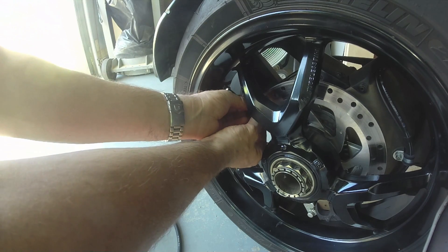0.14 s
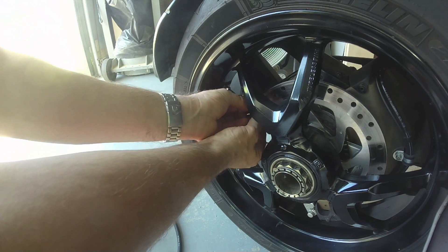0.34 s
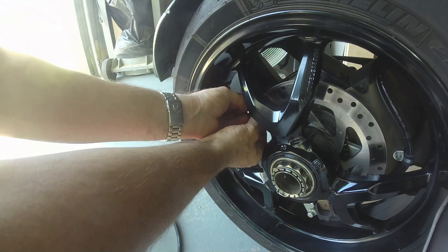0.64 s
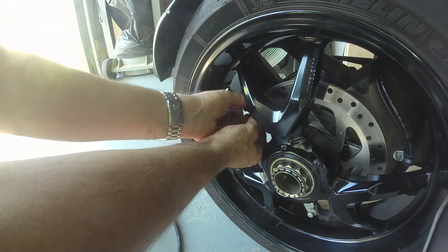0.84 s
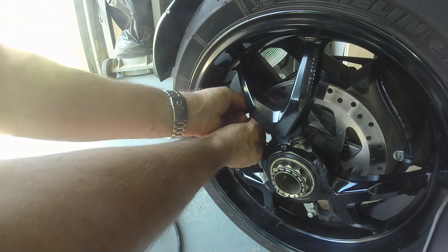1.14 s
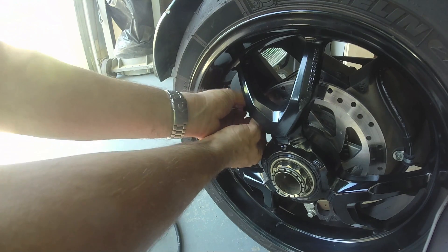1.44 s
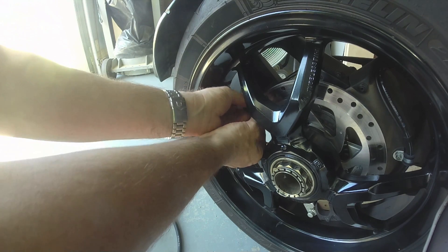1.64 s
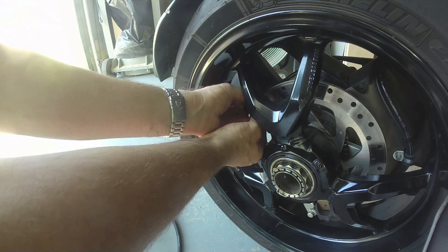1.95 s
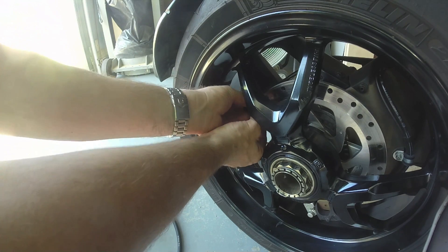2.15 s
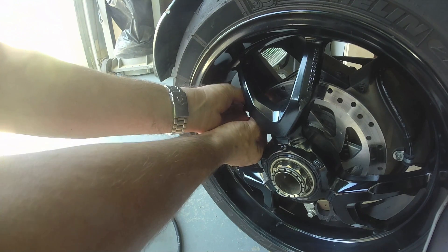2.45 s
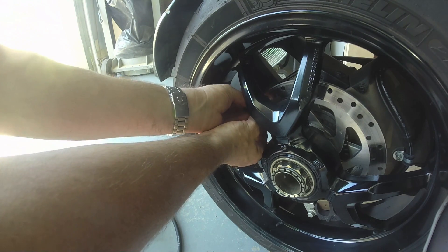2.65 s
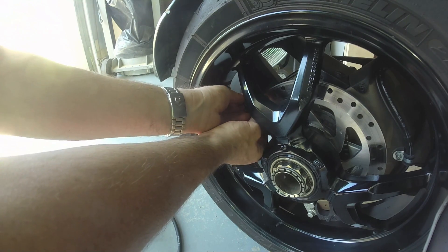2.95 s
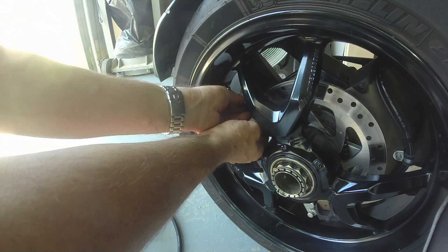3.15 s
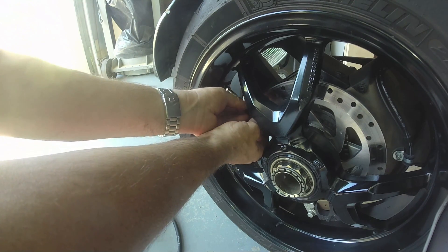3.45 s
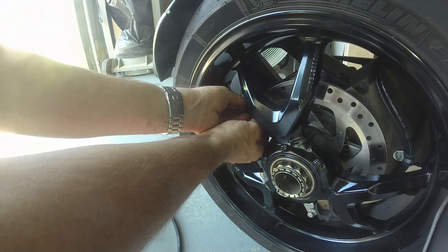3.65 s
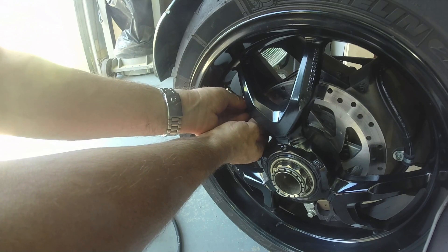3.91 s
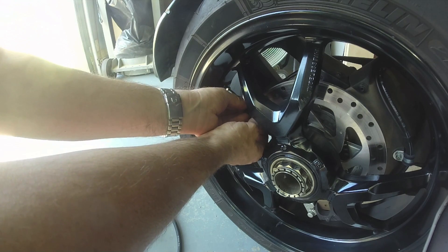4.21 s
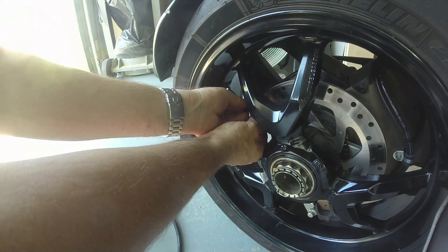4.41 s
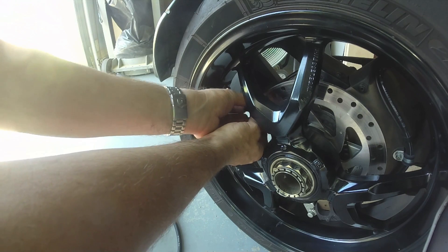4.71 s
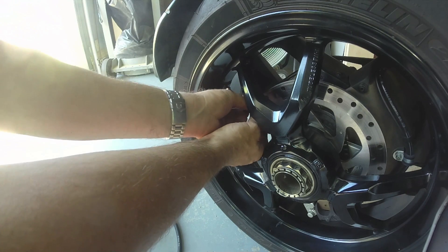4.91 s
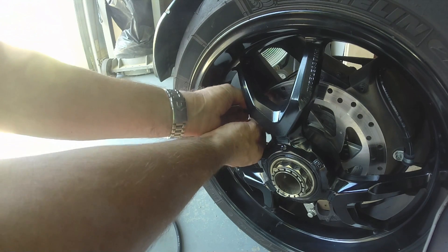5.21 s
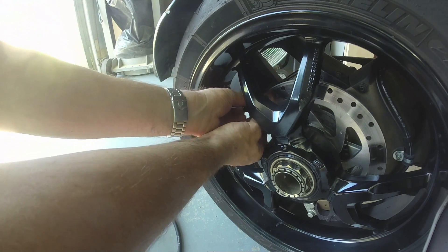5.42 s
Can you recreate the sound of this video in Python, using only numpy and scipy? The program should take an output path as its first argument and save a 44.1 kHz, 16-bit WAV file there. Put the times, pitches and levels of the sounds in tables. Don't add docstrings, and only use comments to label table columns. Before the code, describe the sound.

Quiet hissing escapes as a valve core is loosened by hand, with a few small metallic clicks and brief puffs of air. Then pressurised air rushes out suddenly, bright and turbulent, its whistle coming and going, dips, and returns in stronger bursts until the core pops free. Close mono pickup, slight room reverberation, with distant low rumble and a wavering motor hum behind.

```python
import sys
import numpy as np
from scipy import signal
from scipy.fft import rfft, irfft, next_fast_len
from scipy.io import wavfile
from scipy.ndimage import uniform_filter1d

SR = 44100
rng = np.random.default_rng(int(sys.argv[2]) if len(sys.argv) > 2 else 0)


def nominal_scale(level):
    x = np.asarray(level, float) / 20
    return 10 ** x


def materialize(psi):
    bounded = np.clip(np.atleast_2d(psi).T, -1, 1)
    quanta = np.round(bounded * 32767).astype(np.int16)
    wavfile.write(sys.argv[1], SR, quanta)


N = 245637


def in_time(rows):
    s, *columns = np.transpose(rows)
    return [np.interp(np.arange(N) / SR, s, column) for column in columns]


def rms_one(x):
    return x / np.sqrt(np.mean(x ** 2) + 1e-20)


def drift(rate_hz):
    r = np.exp(-40 * np.pi * rate_hz / SR)
    noise = rng.standard_normal(N // 20 + 2002)
    slow = signal.lfilter([1], [1, -2 * r, r * r], noise)[2000:]
    return np.interp(np.arange(N) / 20, np.arange(len(slow)), rms_one(slow))


def resonance(x, hz, width_hz):
    r = np.exp(-np.pi * width_hz / SR)
    zeros = np.array([1, 0, -1]) * (1 - r * r) / 2
    poles = [1, -2 * r * np.cos(2 * np.pi * hz / SR), r * r]
    return signal.lfilter(zeros, poles, x)


def spell(start_s, length_s, fade_s):
    t = np.arange(N) / SR - start_s
    return np.clip(np.minimum(t, length_s - t) / fade_s + 0.5, 0, 1)


def rumble():
    # f/Hz, level per Hz/dB
    spectrum = [(12, -40), (20, -22.5), (118, 2.5), (144, -7), (229, -7.5), (256, -8.5), (382, -11.5),
                (498, -19), (793, -19), (866, -24), (1060, -21), (1130, -28), (4000, -29.5), (5200, -63),
                (8800, -120)]
    # t/s, level/dB
    swell = [(0.0, -44), (0.35, -43), (1.18, -44.5), (1.44, -44), (2.34, -42), (3.11, -42), (3.66, -43),
             (5.15, -41), (5.5, -41)]
    size = next_fast_len(N)
    hz = np.maximum(np.fft.rfftfreq(size, 1 / SR), 1)
    corner_hz, corner_db = np.transpose(spectrum)
    shape = nominal_scale(np.interp(np.log(hz), np.log(corner_hz), corner_db))
    noise = irfft(rfft(rng.standard_normal(size)) * shape, size)[:N]
    return nominal_scale(in_time(swell)[0] - 0.5) * rms_one(noise)


def drones():
    # f/Hz, level/dB
    tones = [(28, -56.5), (92, -69.5), (139, -56), (176, -57), (226, -59), (313, -58)]
    t = np.arange(N) / SR
    out = np.zeros(N)
    for hz, level_db in tones:
        level = nominal_scale(level_db + 1.0 + 3.3 * drift(0.52))
        out += level * np.sin(2 * np.pi * hz * t + 2.26 * drift(0.89))
    return out


def hum():
    # t/s, second harmonic f/Hz, level/dB
    motor = [(0, 235, -60.5), (1.2, 237.2, -51.5), (2.2, 234.3, -55.5), (2.6, 237.8, -51),
             (3.8, 236.2, -47.5), (4.6, 235.8, -50), (5.2, 243, -43.5), (5.57, 241, -48)]
    hz, level_db = in_time(motor)
    wavering_hz = hz * (1 + 0.00553 * drift(2.97))
    phase = np.cumsum(np.pi * wavering_hz / SR)
    octave = nominal_scale(level_db + 1.57 * drift(2.0)) * np.sin(2 * phase)
    fundamental = nominal_scale(level_db - 2.5 + 4.0 * drift(2.4)) * np.sin(phase)
    return np.sqrt(2) * (octave + fundamental)


def garage(x):
    t60_s, onset_s = 0.55, 0.006
    t = np.arange(round(SR / 2)) / SR
    answer = rng.standard_normal(len(t)) * nominal_scale(-60 * t / t60_s) * (t > onset_s)
    return signal.fftconvolve(x, answer / np.sqrt(np.sum(answer ** 2)))[:N]


def ticks():
    # t/s, peak level/dB, ring f/Hz, brightness/dB, body/dB
    taps = [
        (0.535, -31, 1400, -7, -9),
        (0.663, -34, 3180, -12, 1),
        (1.6984, -26, 3360, 1, 3),
        (1.722, -33, 3320, -5, -10),
        (1.887, -22, 712, -6, -8),
        (2.153, -32.5, 3350, -8, -4),
    ]
    t = np.arange(round(SR / 20)) / SR
    out = np.zeros(N)
    for s, peak_db, hz, bright_db, body_db in taps:
        partials = np.sin(2 * np.pi * hz * t) + 0.27 * np.sin(2 * np.pi * 1.24 * hz * t)
        ring = partials * nominal_scale(-60 * t / 0.039)
        rattle = 1.08 * rng.standard_normal(len(t)) * nominal_scale(-60 * t / 0.045)
        burst = rattle + 8 * nominal_scale(body_db / 2) * (t == 0)
        body = nominal_scale(body_db) * resonance(burst, 1500, 1040)
        edge = nominal_scale(bright_db) * resonance(burst, 3070, 1100)
        at = round(s * SR)
        out[at:at + len(t)] += nominal_scale(peak_db) * (0.36 * ring - 1.23 * (body + edge))
    return signal.sosfilt(signal.butter(4, 5200, fs=SR, output="sos"), out)


def puff():
    # level/dB, f/Hz, width/Hz
    open_stem = (-20, 610, 170)
    level_db, hz, width_hz = open_stem
    free_s, opening_s = 5.553, 0.006
    opening = np.clip((np.arange(N) / SR - free_s) / opening_s, 0, 1)
    rush = resonance(rng.standard_normal(N), hz, width_hz)
    return nominal_scale(level_db) * opening * rush / np.std(rush[opening > 0])


def spurt(start_s, rise_s, open_s):
    sag_db_per_s, shut_db_per_s = 19.5, 1000
    t = np.arange(N) / SR - start_s
    sag_db = sag_db_per_s * np.maximum(t - rise_s, 0)
    shut_db = np.minimum(shut_db_per_s * np.maximum(t - open_s, 0), 200)
    return np.clip(t / rise_s, 0, 1) * nominal_scale(-sag_db - shut_db)


def flows():
    # t/s, gap hiss level/dB, aim down the stem/dB, edge spray/dB
    steady = [(0, -43, -16.5, -14.5), (0.62, -40, -19.5, -18.5), (0.84, -51.5, -14, -13),
              (1.04, -53, -6, -8), (1.14, -41, -10, -10.5), (1.58, -45.5, -2.5, -6),
              (1.62, -40, -14.5, -15), (1.83, -41.5, -18, -19), (2.0, -46.5, -3.5, -7),
              (2.28, -45, -21.5, -17.5), (2.5, -45.5, -5.5, -8), (2.65, -22, -6, -15),
              (3.4, -30, -7.5, -8.5), (4.1, -25, -5.5, -12.5), (4.6, -31, -2.5, -9),
              (4.77, -35, -5.5, -13.5), (4.88, -23.5, -5.5, -17), (5.57, -30.5, 1.9, -11)]
    # start t/s, open t/s, flow level/dB, aim down the stem/dB, edge spray/dB
    twists = [(0.656, 0.15, -36, -11.5, -11.5), (1.262, 0.097, -33, -1, -12), (1.364, 0.07, -30, -1.5, -14),
              (1.7, 0.032, -36, -14, -19), (2.303, 0.052, -34, 5.5, -11.5), (2.652, 0.078, -18, -14.5, -26),
              (2.756, 0.12, -24.5, -1.5, -31), (3.305, 0.275, -41.5, 13.5, -16), (3.8, 0.18, -36, -22, 0.5),
              (4.01, 0.18, -27, -5, -30), (5.1, 0.051, -23.5, -6, -16), (5.29, 0.24, -24, -9, -18),
              (5.462, 0.074, -13.5, -13, -18), (5.549, 0.011, -8, -4, -13), (4.335, 0.3, -35, 2.5, -14),
              (4.805, 0.044, -39, 4, -21), (4.85, 0.12, -44, -7, -1), (4.99, 0.05, -40, -8, 3)]
    # start t/s, open t/s, flow level/dB, aim down the stem/dB, edge spray/dB
    leans = [(0.62, 0.069, -37, -27, -20), (1.048, 0.069, -36, 2.5, -9), (1.15, 0.039, -40, -17, -16),
             (1.74, 0.059, -38, -14.5, -15), (2.32, 0.025, -30.5, 1.5, -20), (2.91, 0.14, -20, -12, -15.5),
             (3.0, 0.13, -24, -29, -9.5), (3.2, 0.12, -23.5, -16, -14.5), (3.42, 0.12, -43.5, 9.5, -6),
             (3.581, 0.13, -23.5, -11, -10.5), (3.66, 0.12, -26, -19, -10.5), (4.16, 0.087, -36, 7.5, -6),
             (4.23, 0.11, -29.5, -10, -5.5), (4.96, 0.14, -22, -5, -15.5), (5.31, 0.052, -23, -10, -21),
             (5.41, 0.063, -23.5, -6, -28)]
    # start t/s, length t/s, stem loss/dB, gap loss/dB
    covers = [(2.358, 0.16, 0.5, -3.3), (2.597, 0.052, 3.5, 3), (2.702, 0.053, 4.5, 1.8),
              (2.825, 0.051, 2, 1), (5.541, 0.013, 2, 6.5), (3.038, 0.07, 1.5, -1.4), (3.335, 0.07, 2.5, 2),
              (3.597, 0.22, 4.5, -0.5), (4.625, 0.093, 3, 1), (5.27, 0.031, -1, 4)]
    flow_db, aim_db, edge_db = in_time(steady)
    power = nominal_scale(2 * np.array([flow_db, flow_db + aim_db, flow_db + edge_db]))
    rises_s = [0.01] * len(twists) + [0.59 * row[1] for row in leans]
    for (s, open_s, flow_db, aim_db, edge_db), rise_s in zip([*twists, *leans], rises_s):
        burst_db = flow_db + np.array([[0], [aim_db], [edge_db]])
        power = power + nominal_scale(2 * burst_db) * spurt(s, rise_s, open_s) ** 2
    loss_db = np.zeros((3, N))
    for s, length_s, stem_db, gap_db in covers:
        loss_db += spell(s, length_s, fade_s=0.0059) * np.array([[gap_db], [stem_db], [gap_db]])
    return 10 * np.log10(power) - loss_db


def whistling():
    # start t/s, length t/s, level over spray/dB, lean/dB
    spells = [
        (0.15, 0.55, 0, -12),
        (2.68, 0.38, 2, -6),
        (3.16, 0.17, 9, 2.5),
        (3.345, 0.32, -0.5, -6),
        (3.57, 0.26, 15, 0.5),
        (3.815, 0.22, 9, -2.5),
        (4.03, 0.36, 5, -13),
        (4.87, 0.17, 5.5, -2),
        (5.37, 0.18, 3.5, -8),
    ]
    rest_db, rest_lean_db = 1.1, -5
    out = np.tile([[rest_db], [rest_lean_db]], N).astype(float)
    for s, length_s, over_db, lean_db in spells:
        out = out + spell(s, length_s, fade_s=0.051) * (np.array([[over_db], [lean_db]]) - out)
    return out


def air_space(modes, level_db, lean_db_per_octave, sway_db):
    out, power = np.zeros(N), 0
    middle_hz = np.mean(np.array(modes)[:, 0])
    for hz, width_hz, mode_db in modes:
        eddies = rng.standard_normal(N)
        once = resonance(eddies, hz, 1.46 * width_hz)
        rung = resonance(once, hz, 1.46 * width_hz)
        share_db = mode_db + lean_db_per_octave * np.log2(hz / middle_hz)
        out += nominal_scale(share_db + sway_db * drift(5.8)) * rung
        power = power + nominal_scale(2 * share_db) * np.mean(rung ** 2)
    return nominal_scale(level_db) * out / np.sqrt(power)


def jet():
    # f/Hz, width/Hz, level/dB
    gap = [(5077, 380, -2.5), (5577, 590, 0.5), (6170, 240, -1.5), (6674, 540, -6), (7380, 450, -11.5)]
    # f/Hz, width/Hz, level/dB
    wide_gap = [(4622, 200, 0)]
    # f/Hz, width/Hz, level/dB
    pipe_low = [(630, 101, -11), (930, 250, -10.5), (1205, 160, -3), (1446, 158, 0.5), (1626, 116, -5),
                (1964, 354, -6)]
    # f/Hz, width/Hz, level/dB
    pipe_high = [(2436, 137, -6), (2793, 168, -2), (3150, 160, -2), (3372, 273, -1.5)]
    # f/Hz, width/Hz, level/dB
    palm = [(3840, 670, 0.18), (4240, 280, -1.2)]
    # f/Hz, width/Hz, level/dB
    edge = [(7930, 530, -1.5), (8880, 620, -0.5), (12200, 910, -5), (13200, 550, -11), (13760, 520, -11),
            (14950, 400, -14)]
    # f/Hz, width/Hz, level/dB
    whistle = [(9630, 230, -3), (10190, 370, -1), (10100, 330, 0), (11090, 440, -1.5), (11870, 520, -6.5)]
    # t/s, tightness as gap lean/dB, wide gap trim/dB, spray fineness/(dB per octave)
    seal = [(0, 3, -3, -2), (0.4, 5.5, -4, -1.2), (0.7, 0, -11, -2.5), (0.95, 0.5, 1.2, 10),
            (1.3, 0.4, -1.2, 1), (1.7, -1.5, -10, 5), (2, 0.1, -1.2, 7), (2.3, -3, -4, -3),
            (2.45, -0.5, 2.5, -1.2), (2.72, -4, -6, -3), (2.95, 1.7, 1.5, 5), (3.4, -1, 4, -9),
            (3.65, 1, -5.5, 4), (3.98, 2, 4.5, 0.1), (4.07, -3, 1.5, -1), (4.6, 2.5, -1.5, -5),
            (4.85, -0.3, 5.5, 5), (5.57, -0.5, -6, -1.2)]
    # t/s, upper pipe mode freed/dB, palm cavity/dB, pipe depth/dB
    grip = [(0, -3.5, -5, -1.2), (0.55, -10.5, 1, 8), (0.7, -3.8, 1, 3), (1.1, -1.5, -3, -0.5),
            (1.3, -0.3, -0.5, 3), (1.7, -1, -6, -2), (2, -3, -2, 0), (2.33, -1.5, 1, -3.5),
            (2.45, 0.1, -3, 7), (2.7, -3.5, 0.5, -1), (3.3, 3.5, -12.5, 0.5), (3.45, 0, -13, 2),
            (3.7, -2, -3, -2.5), (4.07, 4.5, -11, -2.5), (4.25, 1, -12, -4), (4.6, -3, -3, 3),
            (5.03, 1.1, -5, -3), (5.57, 0.8, -5.5, 0.7)]
    gap_db, low_db, spray_db = flows()
    whistle_db, whistle_lean = whistling()
    gap_lean, wide_db, fine_db = in_time(seal)
    freed_db, palm_db, depth_db = in_time(grip)
    high_db = gap_db + 0.52 * (low_db - gap_db) - 3 + freed_db
    short_of_full_db = np.minimum(gap_db + 27.0, 0)
    wide_level_db = gap_db + wide_db - 9.0 - 0.5 * gap_lean + 0.92 * short_of_full_db
    tight_db = np.maximum(gap_lean - 1.5, 0)
    spray_lean = fine_db - 2.0 * tight_db - 0.35 * np.maximum(whistle_db - 15, 0)
    flow = (air_space(gap, gap_db, 5.2 * gap_lean, sway_db=-0.45)
            + air_space(wide_gap, wide_level_db, 0, sway_db=3.0)
            + air_space(pipe_low, low_db, -1.1 * depth_db, sway_db=2.2)
            + air_space(pipe_high, high_db - 1.5, 0, sway_db=2.7)
            + air_space(palm, high_db + palm_db - 3.5, 0, sway_db=3.0)
            + air_space(edge, spray_db, spray_lean, sway_db=2.8)
            + air_space(whistle, spray_db + whistle_db, 5 * (whistle_lean + 2.0), sway_db=-1.1))
    return nominal_scale(0.47 * drift(39.0)) * flow


def scene():
    valve = jet() + ticks() + puff()
    mono = valve + nominal_scale(-15) * garage(valve) + hum() + drones() + rumble()
    return np.array([mono, mono])


def top_cut(x):
    return signal.sosfilt(signal.butter(12, 15240, fs=SR, output="sos"), x)


def record(dry):
    # edge f/Hz, whistle level/dB
    dropouts = [(13950, -21.5), (14600, -24.5)]
    x = 1.26 * np.tanh(dry[0] / 1.33)
    size = next_fast_len(N)
    hz = np.fft.rfftfreq(size, 1 / SR)
    whistle = irfft(rfft(x, size) * (np.abs(hz - 10900) < 1400), size)[:N]
    for edge_hz, threshold_db in dropouts:
        silenced = uniform_filter1d(whistle ** 2, size=4000) > nominal_scale(2 * threshold_db)
        top = irfft(rfft(x, size) * (hz > edge_hz), size)[:N]
        x = x - top * uniform_filter1d(silenced * 1.0, size=2000)
    return top_cut(np.array([x, x]))


dry = scene()
out = record(dry)
materialize(out)
```